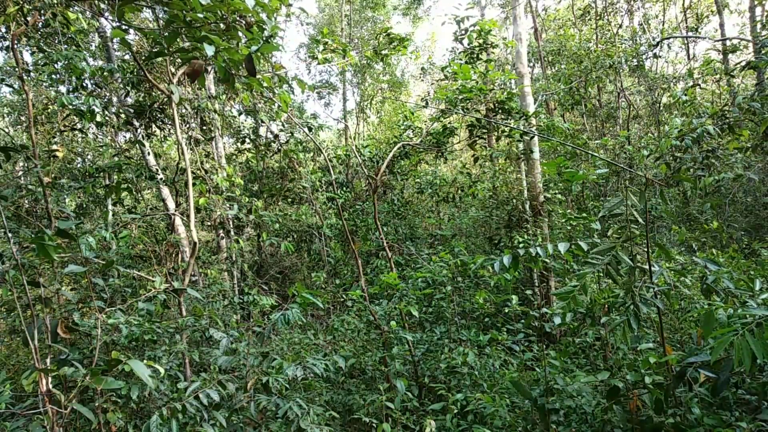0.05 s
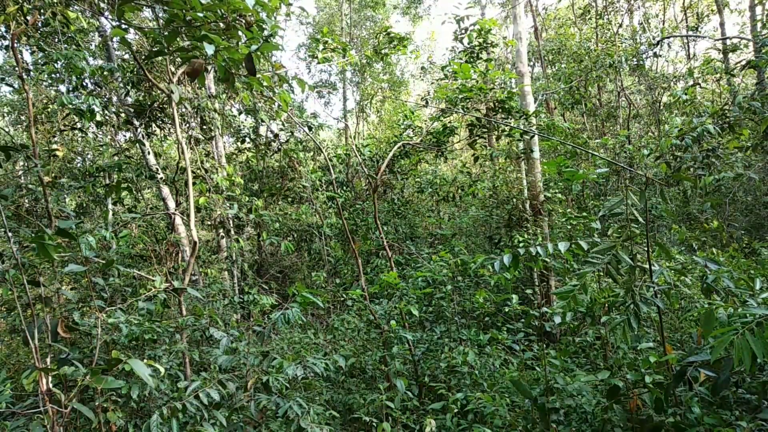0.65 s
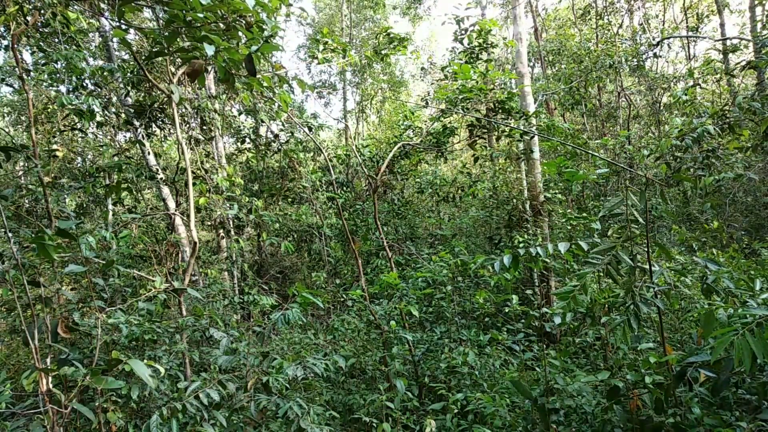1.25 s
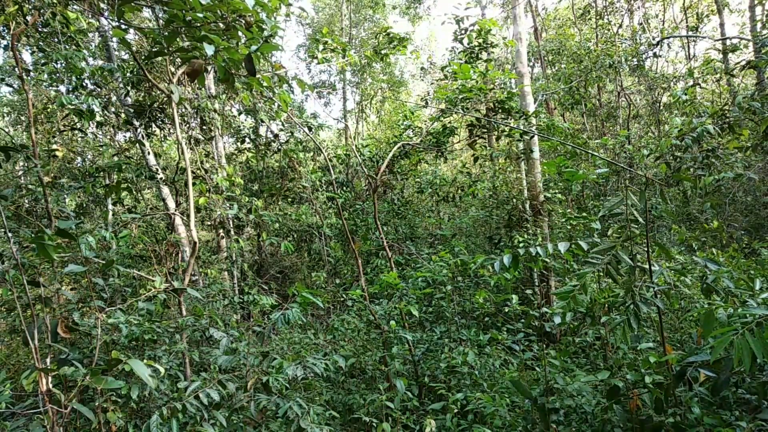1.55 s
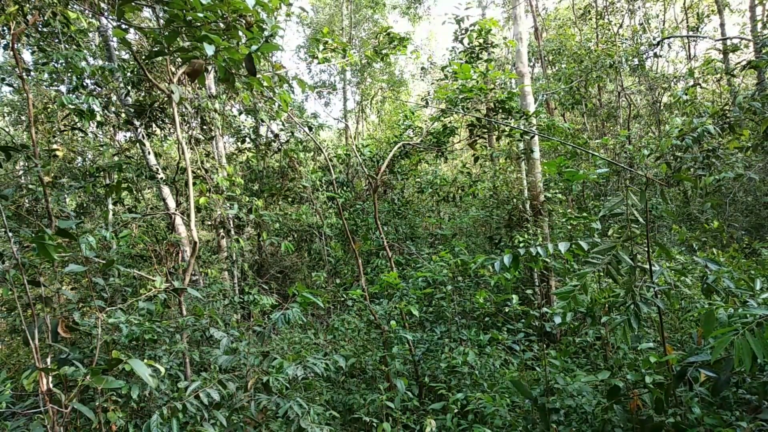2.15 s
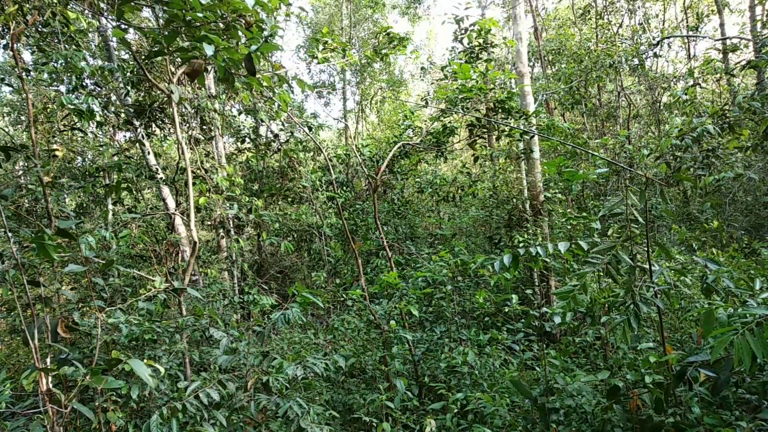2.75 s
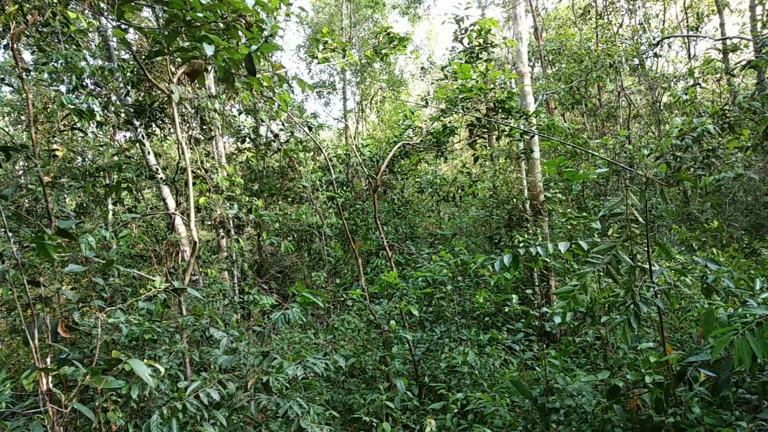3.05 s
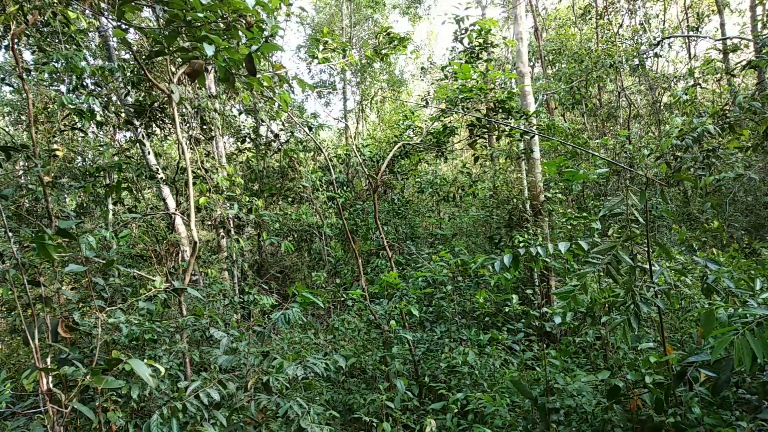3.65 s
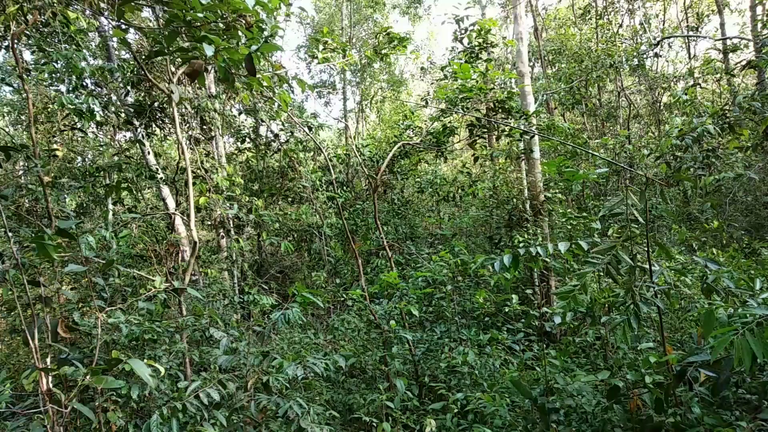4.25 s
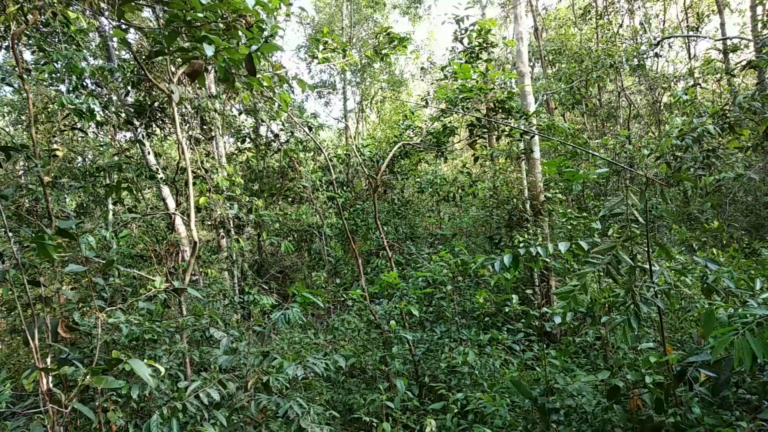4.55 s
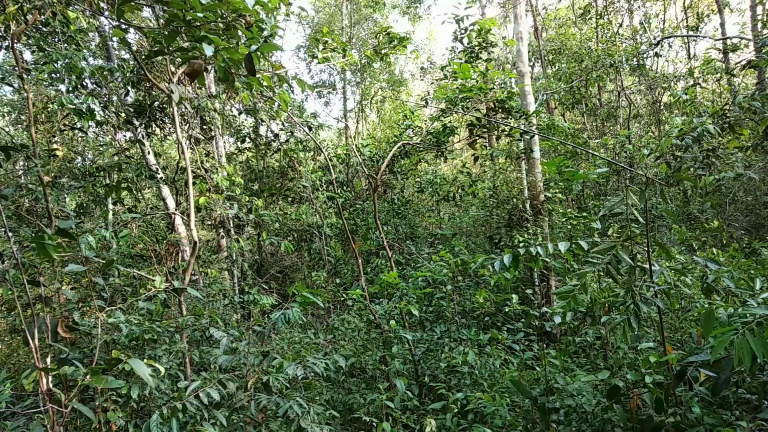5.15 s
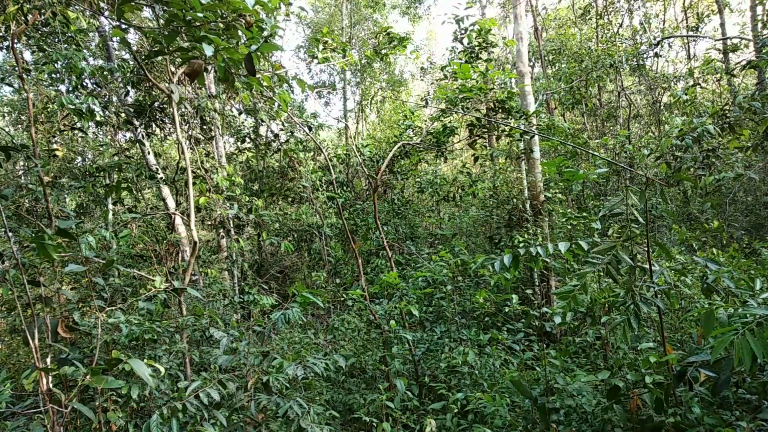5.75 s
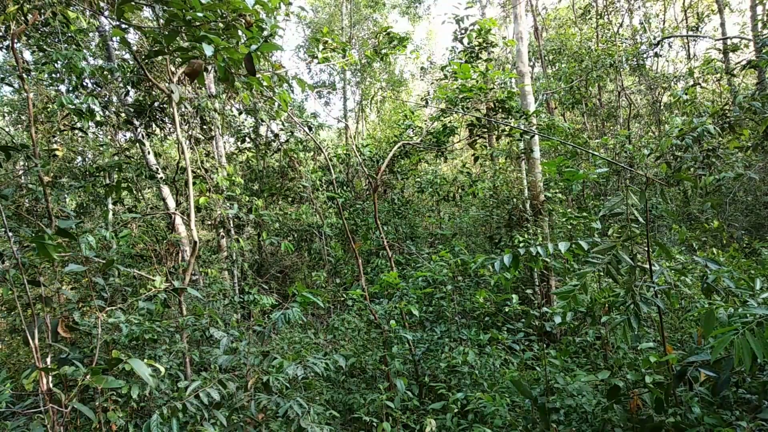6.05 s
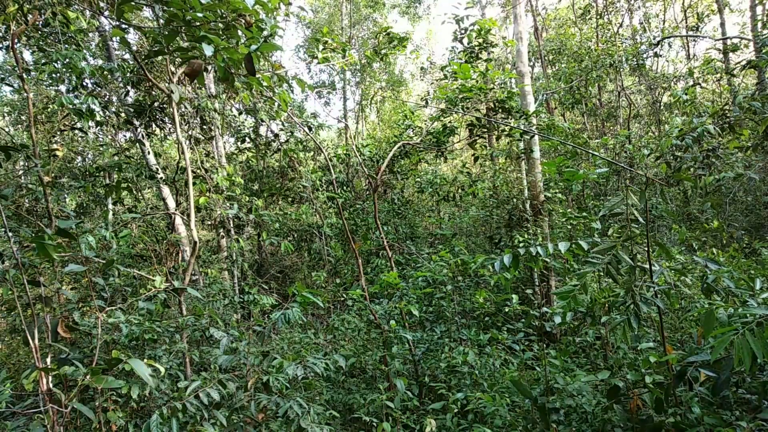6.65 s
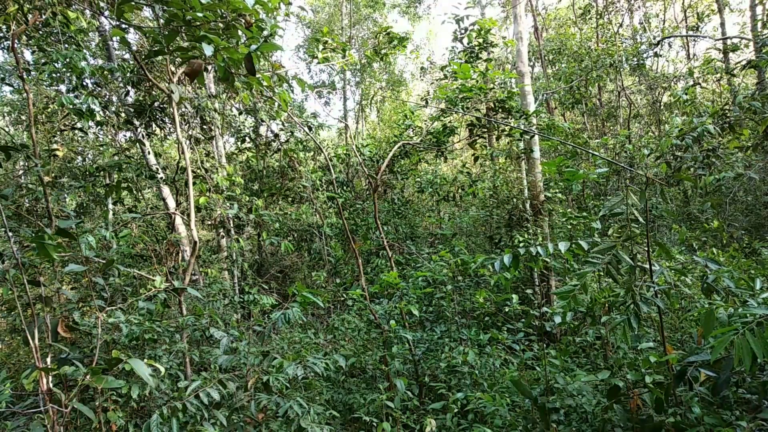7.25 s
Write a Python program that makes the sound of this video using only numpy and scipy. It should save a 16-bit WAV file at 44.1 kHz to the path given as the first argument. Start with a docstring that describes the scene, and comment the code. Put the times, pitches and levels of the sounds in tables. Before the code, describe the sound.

Rising chirps, fast buzzy trills and a burst of harsh scolding from small birds, with insects whining steadily in a forest.

```python
"""Small birds call in a dense forest, over the steady whine of insects and a low hush of air.
First one bird whistles a run of rising chirps as a soft gust passes. Thin pips begin, twigs tick twice
and a far bird gives a few hoarse calls. Another bird starts a fast, low trill of upward flicks. Then the
first bird scolds in harsh, rattling rasps that end in a squeal, and the trill returns.
Trunks and leaves scatter every call into a short echo."""
import sys
import numpy as np
from scipy import signal
from scipy.fft import rfft, irfft
from scipy.io import wavfile

SR = 44100
rng = np.random.default_rng(int(sys.argv[2]) if len(sys.argv) > 2 else 0)


def master_out(mix):
    """Clip the mix to full scale and print it as 16-bit PCM to the path in sys.argv[1]."""
    frames = np.transpose(np.atleast_2d(mix))
    ceiling = np.clip(frames, -1, 1)
    pcm = np.round(ceiling * 32767).astype(np.int16)
    wavfile.write(sys.argv[1], SR, pcm)


N = 321930
TIME = np.arange(N) / SR
HZ = np.fft.rfftfreq(N, 1 / SR)

# breathy edge of a forced note: (frequency [Hz], level [dB])
HOARSE_BREATH = [(900, -11.5), (1500, -2), (2400, -6.5), (3300, -5), (4400, 4), (5700, 13), (6700, 9),
                 (7600, 8.5), (9000, 3.5), (10200, -15.5), (13000, -25), (15300, -16)]


def chirps(foot_hz=4590, forced_db=-43, second_db=-29, third_db=-24):
    """Each chirp climbs as a whistle, turns hoarser at the top and drops briefly."""
    # (time [s], length [s], level [dB], top pitch [Hz], roughness [0-1])
    calls = [(0.05, 0.072, -52, 5990, 0.43), (0.143, 0.077, -49.5, 6510, 0.51),
             (0.252, 0.079, -52.5, 6100, 0.73), (0.366, 0.082, -45, 6140, 0.41),
             (0.492, 0.07, -44.5, 6146, 0.45), (0.608, 0.074, -45, 5955, 0.44),
             (0.724, 0.073, -45, 6035, 0.41), (0.872, 0.07, -45, 6017, 0.42)]
    # path of one chirp: (share of its length [0-1], climb [0-1], level [dB], roughness [factor])
    path = [(0, 0.017, -6, 0.83), (0.181, 0.356, 4.5, 0.62), (0.4, .68, 7, 1.16), (0.599, .94, 6, 0.96),
            (0.761, 1, 5.5, 1.25), (.9, 0.622, 8, 1.44), (1, 0.33, -27, 1.1)]
    # far ring of the trunks: (frequency [Hz], level [dB])
    trunk_ring = [(3000, 0), (4700, -9.5), (5050, -7.5), (5330, 1.5), (5650, -7), (5950, 8), (6150, -1),
                  (6450, -4), (6900, -11), (9000, 9), (14000, -10)]
    out = np.zeros(N)
    share, climb, path_db, strain = np.transpose(path)
    for start, length, db, top_hz, roughness in calls:
        size = round(length * SR)
        progress = np.linspace(0, 1, size)
        hz = foot_hz + (top_hz - foot_hz) * np.interp(progress, share, climb)
        tone = whistle(hz, roughness * np.interp(progress, share, strain), jitter=0.0178,
                       flutter=0.33, flutter_hz=110.8, spread_hz=330, air=0.22, warble=0.011)
        spin = signal.hilbert(tone) / np.sqrt(2)  # squaring this doubles the pitch, cubing triples it
        second = gain_of(second_db) * unit_level((spin ** 2).real)
        third = gain_of(third_db) * unit_level((spin ** 3).real * wobble(size, 500))
        tone = tone + gain_of(db - forced_db) * (second + third)  # forcing adds overtones
        loudness = gain_of(db + np.interp(progress, share, path_db)) * signal.windows.tukey(size, .1)
        add(out, start, loudness * tone)
    near = gain_of(-2.5) * forest_echo(out, trunk_s=0.27, leaf_s=0.041, leaf_db=17)
    ring = gain_of(1.5) * coloured(forest_echo(out, trunk_s=0.71, leaf_s=0.02, leaf_db=4), trunk_ring)
    return direct_sound(out, lead_ms=0.15, left_db=-2.5) + (near + ring) * gain_of([[-1], [1]])


def rasps(rattle_hz=55, rattle_depth=.42, beak_width_hz=600, beak_db=9.5, ragged_db=1.5):
    """A rattle shakes reedy overtones and rushing air; the beak boosts overtones near its resonance."""
    # one path per rasp: (time [s], pitch [Hz], level [dB], beak resonance [Hz], overtone level [dB])
    paths = [
        [(4.895, 900, -52, 5400, 4), (4.915, 1008, -38.5, 5600, 0), (4.94, 1026, -40.5, 5750, -1),
         (4.965, 982, -40.5, 5570, 1), (5.005, 967, -42.5, 5570, 5), (5.025, 976, -41, 6900, 2.5),
         (5.065, 981, -42, 6800, 0), (5.09, 923, -39.5, 6500, -5), (5.105, 915, -46, 6400, 7)],
        [(5.172, 919, -43, 5600, 0), (5.185, 964, -38, 5800, -2.5), (5.21, 1022, -38.5, 5860, 1.5),
         (5.235, 984, -39, 5400, 3), (5.262, 942, -39.5, 5650, -0.5), (5.285, 927, -43.5, 5600, -5),
         (5.298, 915, -54, 5600, 5)],
        [(5.31, 928, -45, 5700, 4), (5.325, 985, -37.5, 6000, -1), (5.35, 995, -38.5, 6860, 0),
         (5.368, 960, -38.5, 5750, 2), (5.395, 945, -38, 6600, -4.5), (5.418, 929, -38, 6500, -2.5),
         (5.438, 898, -43, 6400, 3)],
        [(5.472, 901, -48, 5590, 2), (5.49, 960, -36, 5650, -7), (5.52, 1004, -38, 6030, 1.5),
         (5.555, 972, -39.5, 5700, -1.5), (5.63, 954, -41, 5700, 0), (5.67, 962.4, -38.5, 6350, -1.5),
         (5.705, 962, -42, 6860, 4.5), (5.725, 949, -47.5, 6700, 9)],
        [(5.81, 916, -43.5, 6100, 5), (5.835, 1023, -40.5, 6230, -4.5), (5.88, 1026, -35.5, 6370, -1.5),
         (5.92, 958, -36.5, 5500, -14), (5.96, 904, -47.5, 5500, 3)],
    ]
    # overtones of a rasp: (multiple of the pitch, level [dB])
    overtones = [(2, -20), (3, -23.5), (4, -7), (5, -4.5), (6, -4.5), (7, -3.5), (8, -11.5), (9, -14.5)]
    # rushing air: (frequency [Hz], level [dB])
    air_colour = [(1000, -26.5), (1500, -15), (2400, -24), (2900, -14.5), (3300, -26), (4000, -10),
                  (4450, -7.5), (5000, -3.5), (5600, -0.5), (6200, 3.5), (7200, -1), (9000, -1.5),
                  (10000, -16), (12000, -13.5), (15300, -19.5)]
    out = np.zeros(N)
    for path in paths:
        times, *controls = np.transpose(path)
        t = np.arange(times[0], times[-1], 1 / SR)
        size = len(t)
        pitch_hz, db, beak_hz, reed_db = (np.interp(t, times, control) for control in controls)
        rattle = np.sin(2 * np.pi * rattle_hz * (t - t[0]) + 1.7 * wobble(size, 27))
        hz = pitch_hz * (1 + 0.0042 * rattle + 0.0029 * wobble(size, 30))
        phase = phase_of(hz)
        reed = 0
        for k, overtone_db in overtones:
            lift_db = beak_db * np.exp(-((k * hz - beak_hz) / beak_width_hz) ** 2)
            strength = gain_of(overtone_db + lift_db + ragged_db * wobble(size, 31))
            slip = .08 * k * wobble(size, 120)
            reed = reed + strength * np.cos(k * phase + slip)
        gritty_air = noise(size, air_colour) * (1 + 0.3 * wobble(size, 250))
        loudness = gain_of(db) * signal.windows.tukey(size, .04) * (1 + rattle_depth * rattle)
        add(out, times[0], loudness * (gain_of(reed_db - 5) * reed + gain_of(-6) * gritty_air))
    echo = forest_echo(out, trunk_s=.7, leaf_s=0.058, leaf_db=15.5) * gain_of([[.1], [1.9]])
    return gain_of(-2.5) * direct_sound(out, lead_ms=0.13, left_db=0.7) + echo


def squeals():
    """Single gliding notes, clean or hoarse, most with a strong echo."""
    # (time [s], length [s], level [dB], start pitch [Hz], end pitch [Hz], roughness [0-1], echo [dB])
    calls = [(1.812, 0.11, -77, 2780, 1980, 0.5, -11), (4.887, 0.034, -53, 5250, 5620, 0.62, 14),
             (5.808, 0.1, -48.5, 6120, 6330, 0.13, 11), (5.888, 0.085, -49.5, 4950, 5620, 0.56, 11.5),
             (5.943, 0.08, -48.5, 5650, 5450, 0.6, 8)]
    direct, scattered = np.zeros((2, N))
    for start, length, db, start_hz, end_hz, roughness, echo_db in calls:
        hz = np.linspace(start_hz, end_hz, round(length * SR))
        tone = whistle(hz, roughness, jitter=0.0124, flutter=0.59, flutter_hz=58.7,
                       spread_hz=400, air=0.24)
        fade_share = max(.4, 0.67 * roughness)
        note = gain_of(db) * tone * signal.windows.tukey(len(hz), fade_share)
        add(direct, start, note)
        add(scattered, start, note * gain_of(echo_db))
    echo = forest_echo(scattered, trunk_s=0.69, leaf_s=0.064, leaf_db=-14) * gain_of([[-1.7], [1.3]])
    return gain_of(5) * direct_sound(direct, lead_ms=0.16, left_db=-7) + echo


def trill(full_note_s=.0235, full_gap_s=0.072, early_s=.011, shade_hz=4300):
    """Quick upward flicks with an airy edge; the high overtones arrive mostly scattered by leaves."""
    # path of one note: (share of its length [0-1], pitch [Hz], level [dB])
    path = [(0, 1265, -16.5), (0.181, 1500, -3.5), (0.379, 1766, -3), (0.578, 1919, 3.5), (.8, 2055, -0.5),
            (1, 2220, -8)]
    # colour of the bird's throat: (frequency [Hz], level [dB])
    throat = [(1200, -7.5), (2000, -4), (2300, 4.5), (2650, 8), (2950, -9.5), (3300, -2), (3800, -5.5),
              (4150, -8.5), (4800, -24), (5750, -4.5), (6700, -16), (9000, -33)]
    # airy edge of a note: (frequency [Hz], level [dB])
    air_colour = [(2000, -21.5), (4000, 1), (4900, -9), (5450, 0), (5650, -2), (5900, 1), (6300, -3),
                  (7800, -6), (9000, -5), (10000, -27), (12000, -19.5), (15000, -36)]
    # colour of the echo: (frequency [Hz], level [dB])
    echo_colour = [(1600, -6), (2050, -9.5), (2230, 3.0), (2450, -2), (3700, -7.5), (5700, 2.5)]
    voice, air_level = np.zeros((2, N))
    share, path_hz, path_db = np.transpose(path)
    drift = .016 * wobble(N, 450) + .009 * wobble(N, 8)
    grain = .35 * wobble(N, 359)
    notes = trill_notes()
    usual_bright_db = np.mean([note[3] for note in notes])
    for time, gap, db, bright_db in notes:
        stretch = min(gap / full_gap_s, 1)  # the notes lengthen as the trill slows
        size = round(full_note_s * stretch * SR)
        progress = np.linspace(0, 1, size)
        span = (round(time * SR) + np.arange(size)) % N
        foot_db = -260 * (1 - stretch) ** 2 * (1 - progress) ** 2  # quick notes lose their low start
        shape = gain_of(np.interp(progress, share, path_db) + foot_db) * signal.windows.tukey(size, .15)
        phase = phase_of(np.interp(progress, share, path_hz) * (1 + drift[span]))
        tone = (1 + .25 * grain[span]) * np.sin(phase)
        overtones = sum(np.sin(k * phase) * gain_of(20 - 4 * k) for k in range(2, 5))
        overtones *= (1 + grain[span]) * (1.3 - progress)  # rough, and strongest early in the flick
        start = time - early_s * stretch
        add(voice, start, gain_of(db) * shape * (tone + gain_of(bright_db) * overtones))
        add(air_level, start, gain_of(db - 10 + 0.27 * (bright_db - usual_bright_db)) * shape)
    out = coloured(voice, throat) + air_level * noise(N, air_colour)
    shaded = filtered(out, 0.3 + 0.32 / (1 + (HZ / shade_hz) ** 8))
    echo = forest_echo(out, trunk_s=0.26, leaf_s=0.048, leaf_db=5) * gain_of([[-.5], [.5]])
    return gain_of(1.5) * direct_sound(shaded, lead_ms=0.14, left_db=0.5) + coloured(echo, echo_colour)


def trill_notes(slowing_notes=7, warm_up_s=0.075):
    """Runs start quick and soft, then slow. Gives (time [s], gap [s], level [dB], overtones [dB])."""
    # (start [s], end [s], first gap [s], slowest gap [s], start level [dB], end level [dB],
    #  soft start [dB], overtones [dB])
    runs = [(2.7552, 3.55, 0.0546, 0.0726, -47, -47.5, -14, -20),
            (3.6002, 4.86, 0.0664, 0.075, -48, -43.5, -1, -12),
            (6.1685, 7.29, 0.0546, 0.078, -42, -43.5, -2, -16)]
    notes = []
    for start, end, quick, slow, start_db, end_db, soft_db, bright_db in runs:
        time = start
        for k, chance in enumerate(rng.standard_normal(size=40)):
            if time > end:
                break
            gap = slow + (quick - slow) * np.exp(-k / slowing_notes)
            db = np.interp(time, [start, end], [start_db, end_db])
            db += soft_db * np.exp((start - time) / warm_up_s)
            notes.append((time, gap, db - 0.06 * chance, bright_db))
            time += gap
    return notes


def pips(pitch_hz=5900, length_s=0.015):
    """A small, far caller whistles short, thin notes on one high pitch."""
    # (time [s], level [dB])
    calls = [(1.454, -82), (1.625, -72), (1.785, -76), (1.923, -77), (2.053, -66), (2.176, -69),
             (2.227, -67), (2.964, -61), (3.074, -55), (3.114, -57), (3.2255, -54.5), (3.286, -53.5),
             (3.3488, -54), (3.41, -55), (3.465, -53.5), (3.519, -56), (3.663, -53), (3.694, -60),
             (3.795, -56), (3.976, -53), (4.115, -51), (4.257, -53), (4.4087, -50.5), (4.492, -52.5),
             (4.549, -53), (4.672, -52), (4.771, -55), (6.345, -63.5), (6.374, -68), (6.52, -59),
             (6.963, -55), (7.038, -50.5), (7.169, -52), (7.264, -50.5)]
    out, size = np.zeros(N), round(length_s * SR)
    for start, db in calls:
        note = whistle(np.full(size, pitch_hz), roughness=0.06, jitter=0.016, flutter=0.16)
        add(out, start, gain_of(db - 4) * note * signal.windows.tukey(size, .7))
    echo = gain_of(4) * forest_echo(out, trunk_s=0.84, leaf_s=0.12, leaf_db=10)
    return direct_sound(out, lead_ms=0.17, left_db=-11.5) + echo


def far_calls(air=0.61):
    """A far bird's hoarse calls swell and fade, heard mostly through the leaves."""
    # (time [s], length [s], level [dB], start pitch [Hz], end pitch [Hz], half width [Hz])
    calls = [(2.258, 0.077, -61.5, 4730, 5160, 335), (2.348, 0.083, -60, 6400, 6870, 650),
             (2.367, 0.046, -64.5, 4190, 4480, 250), (2.434, 0.091, -55, 6420, 6730, 620),
             (2.527, 0.088, -53, 5830, 6130, 560), (2.654, 0.065, -52, 5800, 6200, 654),
             (2.771, 0.062, -55.5, 5170, 5440, 560)]
    out = np.zeros(N)
    for start, length, db, start_hz, end_hz, spread_hz in calls:
        size = round(length * SR)
        tone = unit_level(rough_tone(phase_of(np.linspace(start_hz, end_hz, size)), spread_hz))
        add(out, start, gain_of(db) * (tone + air * noise(size, HOARSE_BREATH)) * np.hanning(size))
    echo = forest_echo(out, trunk_s=0.43, leaf_s=0.026, leaf_db=11.5) * gain_of([[1.8], [4.8]])
    return gain_of(-6.5) * direct_sound(out, lead_ms=0.15, left_db=-13) + echo


def twig_ticks(decay_s=0.0043, rise_s=0.00074):
    """Dry twigs snap in the undergrowth, each a tiny burst of noise."""
    # (time [s], level [dB], centre frequency [Hz], half width [octaves])
    snaps = [(1.92, -51, 2620, 0.93), (1.924, -47.5, 8000, 0.56), (2.677, -45, 9500, 0.31)]
    out, t = np.zeros(N), np.arange(2048) / SR
    hz = np.fft.rfftfreq(len(t), 1 / SR) + 1
    for start, db, centre_hz, octaves in snaps:
        band = 1 / (1 + (np.log2(hz / centre_hz) / octaves) ** 2)
        crack = unit_level(filtered(rng.standard_normal(len(t)), band))
        add(out, start, gain_of(db) * crack * np.exp(-t / decay_s) * (1 - np.exp(-t / rise_s)))
    echo = gain_of(1.5) * forest_echo(out, trunk_s=0.88, leaf_s=0.14, leaf_db=19)
    return direct_sound(out, lead_ms=0.022, left_db=-5) + echo


def insects(waver_db=1.5):
    """Many far insects merge into narrow, throbbing bands of noise."""
    # (pitch [Hz], half width [Hz], level [dB], throb rate [Hz], throb depth [0-1])
    bands = [(8932, 256, -59, 19, 0.16), (8050, 780, -68, 14, 0.26), (5820, 82, -79, 30, 0.5)]
    out = np.zeros((2, N))
    for hz, width, db, rate, depth in bands:
        band = np.exp(-abs((HZ - hz) / width) ** 1.6)
        chorus = unit_level(filtered(rng.standard_normal((2, N)), band))
        throb = 1 + depth * np.sin(phase_of(rate * (1 + 0.249 * wobble(N, 7.5))))
        out += gain_of(db + waver_db * wobble(N, 8.7)) * chorus * throb
    return out * gain_of([[-1.8], [1.3]])


def treetop_hush(gust_start_s=0.03, rise_s=0.26, hold_s=0.84, fade_s=0.48, gust_db=7.5, calm_db=-4):
    """Air rumbles far off in the treetops, lifted by one soft gust, and leaves hiss faintly."""
    # rumble of the air: (frequency [Hz], level [dB])
    rumble_colour = [(20, -45), (35, -28), (48, -6), (65, -1), (95, 1), (135, -6), (185, -6), (220, 1.5),
                     (290, -2), (400, -4), (480, -9), (800, -12), (1200, -18), (2000, -55)]
    # hiss of the leaves: (frequency [Hz], level [dB])
    leaf_colour = [(600, -20), (1300, 5), (3500, 5.5), (5200, -2), (9000, -21), (11000, -5.5), (15000, 0)]
    # how alike the rumble is left and right: (frequency [Hz], likeness [0-1])
    likeness = [(60, 0.83), (140, 0.68), (250, 0.77), (500, 0.51), (900, 0), (2000, 0.3)]
    left, other = rfft(rng.standard_normal((2, N)))
    alike = curve_at(likeness, HZ)
    right = alike * left + np.sqrt(1 - alike ** 2) * other
    rumble = unit_level(coloured(irfft(np.array([left, right]), N), rumble_colour))
    gust_band = filtered(rumble, 1 / (1 + (np.log2((HZ + 1) / 320) / 0.43) ** 4))
    age = TIME - gust_start_s
    gust = np.clip(age / rise_s, 0, 1) * np.exp(-np.maximum(age - rise_s - hold_s, 0) / fade_s)
    rumble += gust_band * (gain_of(calm_db + gust_db * gust + 1.5 * wobble(N, 2.1)) - 1)
    leaves = unit_level(coloured(rng.standard_normal((2, N)), leaf_colour))
    return rumble * gain_of([[-68.2], [-66.8]]) + gain_of(-71.5) * leaves


def whistle(hz, roughness, jitter, flutter, flutter_hz=95, spread_hz=900, air=0.16, warble=0):
    """A bird's tone shakes in level (flutter) and pitch (warble); forced, part of it turns to noise."""
    size = len(hz)
    shake = np.sin(phase_of(flutter_hz * (1 + 0.308 * wobble(size, 25))))
    phase = phase_of(hz * (1 + jitter * wobble(size, 410) + warble * shake))
    hoarse = 0.5 * rough_tone(phase, spread_hz) + air * noise(size, HOARSE_BREATH)
    roughness = np.clip(roughness, 0, 1)
    tone = (1 - roughness) * unit_level(np.sin(phase)) + roughness * hoarse
    return unit_level((1 + flutter * shake) * tone)


def forest_echo(x, trunk_s, leaf_s, leaf_db):
    """Near leaves scatter the sound, then trunks echo it; each dies by 60 dB in its given time."""
    t = np.arange(SR) / SR
    trunks = gain_of(-60 * t / trunk_s) * (1 - np.exp(-t / 0.037))
    leaves = gain_of(leaf_db - 60 * t / leaf_s) * (1 - np.exp(-t / 0.0044))
    out = np.zeros((2, N))
    for k in range(3):  # three random echoes fade in turn, so the echo's texture keeps changing
        tail = rng.standard_normal((2, SR)) * np.hypot(trunks, leaves)
        turn = np.sqrt(2 / 3) * np.cos(np.pi * (2 * TIME + k / 3))
        out += signal.fftconvolve((x * turn)[None], tail / np.linalg.norm(tail[0]), axes=1)[:, :N]
    return out


def direct_sound(x, lead_ms, left_db):
    """The sound reaches the left microphone first; left_db is its level there against the right."""
    right = filtered(x, np.exp(-2j * np.pi * HZ * lead_ms / 1000))
    return np.array([x * gain_of(left_db / 2), right * gain_of(-left_db / 2)])


def rough_tone(phase, spread_hz):
    """A tone smeared into a band of noise around its pitch."""
    size = len(phase)
    return wobble(size, spread_hz) * np.cos(phase) + wobble(size, spread_hz) * np.sin(phase)


def wobble(size, rate_hz):
    """A smooth random wander of typical size one, up to about the given rate."""
    white = rng.standard_normal(N)[:max(size, SR // 2)]
    hz = np.fft.rfftfreq(len(white), 1 / SR)
    return unit_level(filtered(white, np.exp(-.5 * (hz / rate_hz) ** 2)))[:size]


def noise(size, colour):
    """Noise with the given tone colour, at level one."""
    return unit_level(coloured(rng.standard_normal(N)[:size], colour))


def coloured(x, colour):
    """Shapes a sound by a table of (frequency [Hz], level [dB])."""
    return filtered(x, gain_of(curve_at(colour, np.fft.rfftfreq(x.shape[-1], 1 / SR))))


def filtered(x, gains):
    """Multiplies each frequency in a sound by its own gain."""
    return irfft(rfft(x) * gains, x.shape[-1])


def curve_at(points, hz):
    """Reads between a table's rows, with octaves evenly spaced."""
    point_hz, value = np.transpose(points)
    return np.interp(np.log(hz + 1), np.log(point_hz + 1), value)


def phase_of(hz):
    """The running angle of a wave whose pitch changes."""
    return 2 * np.pi * np.cumsum(hz) / SR


def gain_of(db):
    """Turns decibels into a multiplier."""
    return 10 ** (np.asarray(db) / 20)


def unit_level(x):
    """Scales a sound to an average (rms) level of one."""
    return x / np.sqrt(np.mean(x ** 2) + 1e-20)


def add(mix, start_s, sound):
    """Mixes a sound in at a given time."""
    part = mix[max(round(start_s * SR), 0):][:len(sound)]
    part += sound[:len(part)]


def scene():
    """All the voices of the forest, in stereo."""
    # peaks and dips laid over all the birds' calls, and a thin bright band near 15.5 kHz: # (frequency [Hz],
    # half width [Hz], level [dB])
    peaks_and_dips = [(1520, 73, 5), (1943, 27, 8), (2405, 46, -18), (2920, 180, -9), (3110, 820, 8),
                      (3780, 17, -1), (4110, 21, -10), (4555, 26, -25), (4770, 39, -3.5), (5643, 94, 6.5),
                      (5872, 36, -2.5), (6030, 170, -3.5), (6390, 50, -6.5), (6330, 180, 3.5),
                      (6860, 62, -4), (6800, 39, 5), (12200, 300, -8), (15500, 170, 14)]
    colour_db = sum(db * np.exp(-((HZ - hz) / width) ** 2) for hz, width, db in peaks_and_dips)
    birds = filtered(chirps() + rasps() + squeals() + far_calls() + trill(), gain_of(colour_db))
    return birds + pips() + twig_ticks() + insects() + treetop_hush()


def record(dry):
    """The recorder cuts off the highest treble."""
    low_pass = signal.firwin(1023, cutoff=15540, window=("kaiser", 9), fs=SR)
    return signal.oaconvolve(dry, low_pass[None], "same")


dry = scene()
out = record(dry)
master_out(out)
```